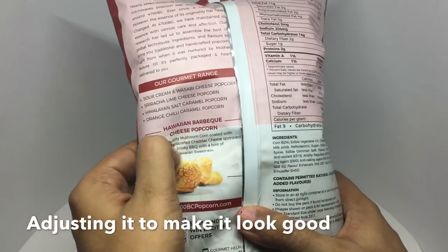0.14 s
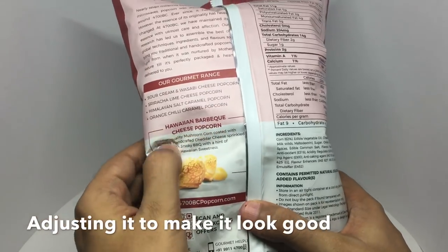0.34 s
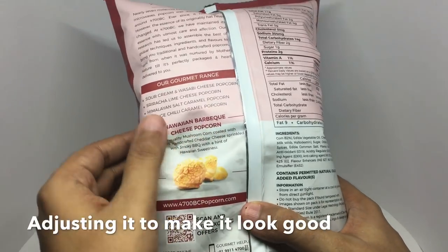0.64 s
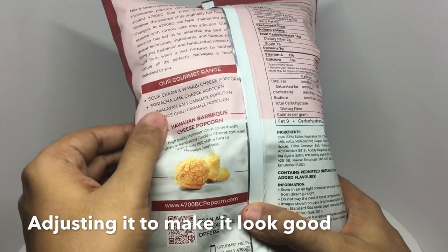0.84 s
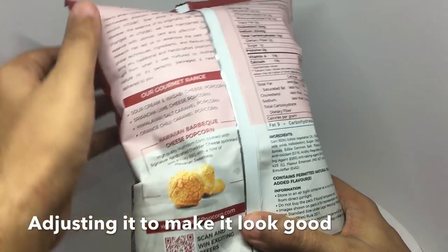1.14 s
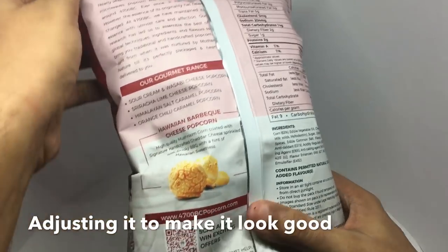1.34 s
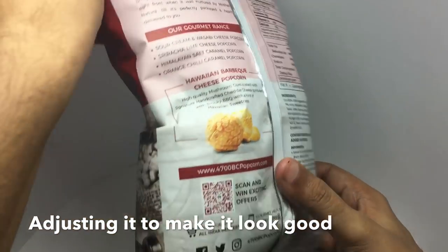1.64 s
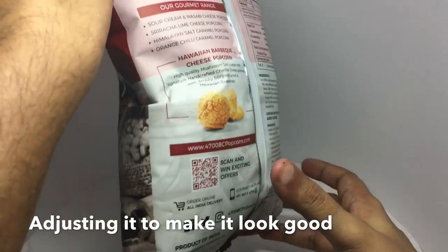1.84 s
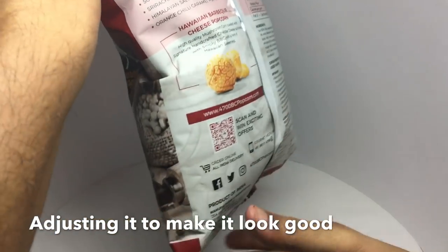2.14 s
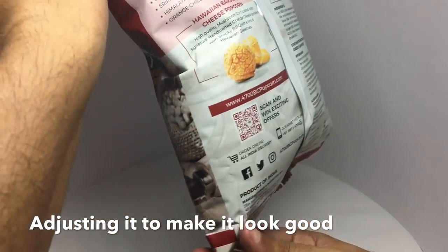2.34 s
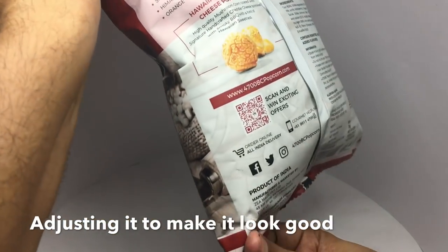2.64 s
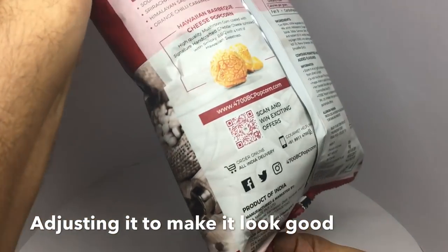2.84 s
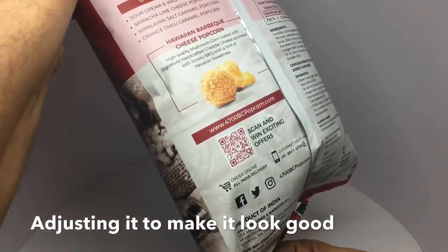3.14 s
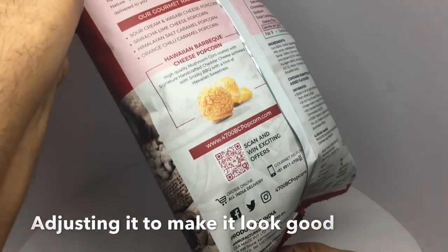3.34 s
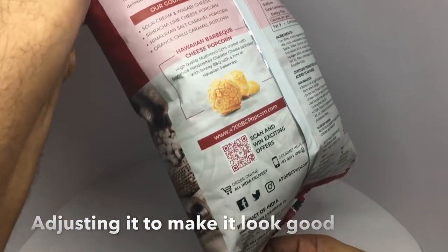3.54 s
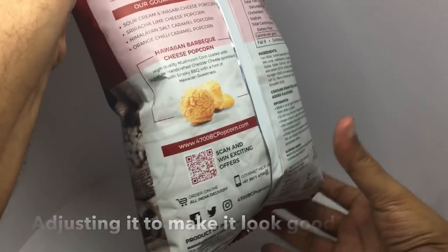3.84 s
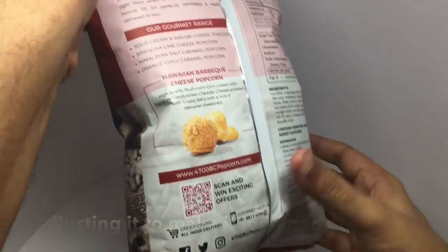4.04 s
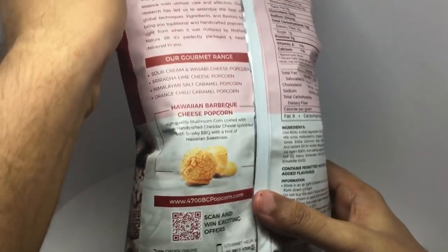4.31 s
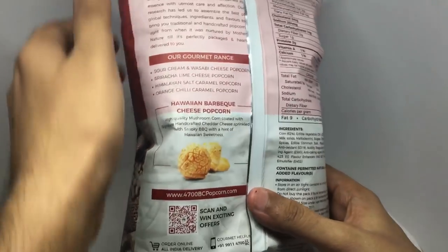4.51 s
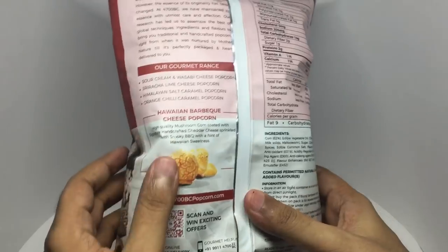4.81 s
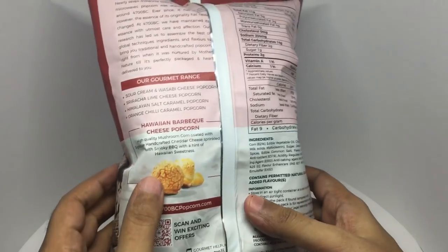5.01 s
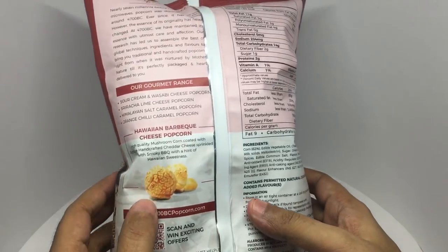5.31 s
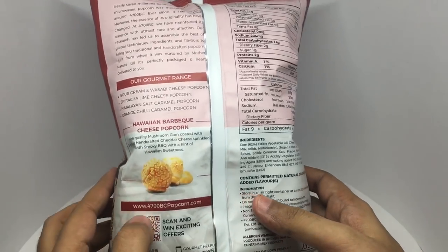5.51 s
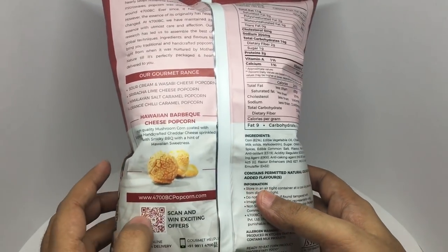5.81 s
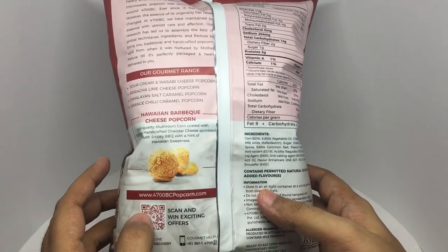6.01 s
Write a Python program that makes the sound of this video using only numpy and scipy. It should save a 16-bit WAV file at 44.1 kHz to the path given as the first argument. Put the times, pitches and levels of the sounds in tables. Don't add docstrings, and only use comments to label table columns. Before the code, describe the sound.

Two hands turn and straighten a sealed, air-filled plastic bag very close to a stereo microphone in a quiet room with a faint low hum. Crisp creases crack at once, a loud snap follows before one second, then sparse crackles and finger hiss. Snaps crowd together near three seconds, and the hardest pop comes around four and a half before the crackling fades out.

```python
import sys
import numpy as np
from scipy import signal
from scipy.fft import rfft, irfft, next_fast_len
from scipy.io import wavfile
from scipy.ndimage import uniform_filter1d

SR = 44100
rng = np.random.default_rng(int(sys.argv[2]) if len(sys.argv) > 2 else 0)


def wav_out(sig):
    wavfile.write(sys.argv[1], SR, np.round(np.clip(np.atleast_2d(sig).T, -1, 1) * 32767).astype(np.int16))


def boost_factor(decibels):
    exponent = np.asarray(decibels, float) / 20
    return 10 ** exponent


N = 271656


def evened(x):
    return x / np.sqrt(np.mean(x ** 2) + 1e-20)


def peaked(x, level_db):
    return boost_factor(level_db) * x / np.sqrt(uniform_filter1d(x[0] ** 2, size=176).max() + 1e-20)


def add(mix, start_s, sound):
    part = mix[:, round(start_s * SR):][:, :sound.shape[1]]
    part += sound[:, :part.shape[1]]


def read(points, hz):
    point_hz, value = np.transpose(points)
    return np.interp(np.log(hz + 1), np.log(point_hz + 1), value)


def colour(spectrum):
    hz = abs(np.fft.fftfreq(4096, 1 / SR))
    log_gain = np.log(boost_factor(np.maximum(read(spectrum, hz), -80)))
    taps = np.fft.ifft(np.exp(np.conj(signal.hilbert(log_gain)))).real[:2048]
    return taps[None] / np.linalg.norm(taps)


def coloured(x, taps):
    return signal.fftconvolve(x, taps, axes=1)[:, :x.shape[1]]


def resonate(x, hz, width_hz):
    r = np.exp(-np.pi * width_hz / SR)
    section = [1, 0, -1, 1, -2 * r * np.cos(2 * np.pi * hz / SR), r * r]
    return signal.sosfilt([section, section], x) * (1 - r) ** 2


def softened(x, hz):
    return signal.sosfilt(signal.butter(2, min(hz, 9000), fs=SR, output="sos"), x)


def grit(shape, spread_db):
    return rng.standard_normal(shape) * boost_factor(spread_db * rng.standard_normal(shape))


# pitch_hz, density_db (dB per Hz)
AIR = [(12, -38.5), (20, -4), (44, -4), (70, 0.5), (118, -3.5), (239, -11.5), (370, -12.5), (572, -22.5),
       (884, -28.5), (1230, -23.5), (3450, -30), (9730, -35.5), (13500, -38)]


def background():
    hum_hz, throb_hz = 59.8, 30.4
    air = boost_factor(-65) * evened(coloured(rng.standard_normal((2, N)), colour([*AIR, (14600, -75.0)])))
    wander = evened(uniform_filter1d(uniform_filter1d(rng.standard_normal(N), size=3000), size=3000))
    turns_s = np.cumsum(1 + .035 * wander) / SR
    throb = 1 + 0.24 * np.sin(2 * np.pi * throb_hz * turns_s)
    hum = np.sin(2 * np.pi * hum_hz * turns_s) * throb
    return air + boost_factor(-63.5) * evened(hum) * [[1], [0]]


# pitch_hz, t60_s
ROOM = [(150, 0.69), (500, 0.42), (2000, 0.53), (6000, 0.33), (14000, 0.15)]


def room(x):
    t = np.arange(SR // 2) / SR
    sway = np.arange(N) / SR * 2 * np.pi * 9.
    out = 0
    for k in range(3):
        hz, at, z = signal.stft(rng.standard_normal((2, len(t))), SR, nperseg=256)
        late = boost_factor(-60 * at / read(ROOM, hz)[:, None])
        near_walls = 3.94 * boost_factor(-60 * at / 0.03)
        tail = signal.istft(z * (late + near_walls), SR, nperseg=256)[1][:, :len(t)]
        tail = tail * np.clip((t - .004) / 0.0043, 0, 1)
        share = np.cos(sway + 2 * np.pi * k / 3) * np.sqrt(2 / 3)
        out = out + signal.fftconvolve(x * share, tail / np.linalg.norm(tail[0]), axes=1)[:, :N]
    return out


# pitch_hz, width_hz, level_db
BOOM = [(114.9, 7.8, 25), (177.2, 17.5, 14.5), (199, 15, 9.5)]


def boom(x):
    return sum(boost_factor(level_db) * resonate(x, hz, width_hz) for hz, width_hz, level_db in BOOM)


def strokes(rows):
    touch_s, lift_db_per_s = 0.015, 139.5
    t = np.arange(0, N + 64, 64) / SR
    each = []
    for start_s, length_s, level_db in rows:
        lifted_s = np.maximum(t - start_s - length_s, 0)
        each.append(np.clip((t - start_s) / touch_s, 0, 1) * boost_factor(level_db - lift_db_per_s * lifted_s))
    return np.interp(np.arange(N) / SR, t, np.linalg.norm(each, axis=0))


# pitch_hz, density_db (dB per Hz)
SLIDE = [(880, -29), (1500, -31), (2190, 2), (2410, 2), (3180, 1), (5880, -3.5), (10800, -3.5),
         (16000, -16)]
# start_s, length_s, level_db
STROKES = [(-0.02, .23, -63), (0.328, 0.19, -66), (0.615, 0.17, -70.5), (0.769, 0.26, -64),
           (1.247, 0.27, -70.5), (1.616, .13, -69.5), (1.76, 0.022, -62), (1.854, 0.11, -75.5),
           (2.1, 0.56, -90.5), (2.578, 0.056, -67), (2.704, 0.05, -67.5), (2.836, 0.1, -70.5),
           (3.02, 0.059, -68), (3.15, 0.062, -78), (3.5, .03, -73), (3.6, 0.13, -73.5), (3.8, 0.05, -65.5),
           (4.18, 0.5, -73.5), (4.377, 0.22, -67.5), (4.712, 0.071, -71), (4.88, 0.1, -68.5),
           (5.07, 0.053, -73), (5.293, 0.27, -75), (5.87, 0.084, -88)]
# start_s, length_s, level_db
DRY_STROKES = [
    (-0.02, 0.16, -84),
    (.33, 0.13, -73),
    (.8, .25, -72),
    (1.25, 0.17, -65),
    (3.6, .03, -68),
    (3.83, 0.051, -81),
    (4.4, 0.21, -77),
    (5.3, 0.21, -86),
]


def sliding():
    slips = grit((2, N), 2.5)
    out = boost_factor(3.0) * strokes(STROKES) * evened(coloured(slips, colour(SLIDE)))
    fizz = resonate(slips[:, ::-1], 10800, 6500)
    out += strokes(DRY_STROKES) * evened(fizz)
    start_s, end_s, squeak_hz = 3.92, 4, 7367
    squeak = evened(resonate(rng.standard_normal((2, round((end_s - start_s) * SR))), squeak_hz, 150.))
    add(out, start_s, boost_factor(-83) * squeak * signal.windows.tukey(squeak.shape[1], .4))
    return out


# pitch_hz, density_db (dB per Hz)
CRUMPLE = [(53, -43.5), (90, -7), (173, 10.5), (553, 2.5), (814, -9), (900, -37.5), (979, -10.5),
           (1440, -13.5), (5000, -38), (6500, -33.5), (11000, -120)]
# start_s, level_db
CRUMPLING = [(0.0, -58), (0.43, -61), (1.2, -71.5), (1.68, -56), (1.82, -59), (1.97, -77.5), (2.5, -72),
             (2.78, -58.5), (2.88, -41), (3.14, -58), (3.28, -76), (3.68, -52.5), (3.98, -83.5),
             (4.27, -64.5), (4.45, -52), (4.65, -68.5), (5.08, -64), (6.16, -74.5)]


def crumpling():
    effort = boost_factor(np.interp(np.arange(N) / SR, *np.transpose(CRUMPLING)))
    folds = boost_factor(4.07 * np.minimum(rng.exponential(1, (2, N)), 4)) * (rng.random(N) < 300. / SR)
    soft = resonate(coloured(folds, colour(CRUMPLE)), 420.0, 2500.)
    return boost_factor(-1.5) * effort * evened(soft)


# pitch_hz, width_hz, level_db
SHELL = [(546., 35, -1), (662.6, 80, -3), (775, 150, -6), (989, 60., -3), (1200., 170, -3.5),
         (1531, 36.4, -0.5), (1876, 33, 4.5), (2252, 49, 2.5), (2476., 82, -11.5), (2925, 38, 0.5),
         (3400., 100, -6), (9650, 900., -4), (10560, 520, -5.5)]


def shell(x):
    return sum(boost_factor(level_db) * resonate(x, hz, width_hz) for hz, width_hz, level_db in SHELL)


def burst(rise_s, fall_s, spread_db, lead):
    t = np.arange(1500) / SR
    run = grit((2, len(t)), spread_db) * (1 - np.exp(-t / rise_s)) * np.exp(-t / fall_s)
    run[:, round(rise_s * SR)] += lead * np.linalg.norm(run, axis=1) * rng.choice([-1, 1], 2)
    return run


def crease(film, leads, crack_db, ring_db, thump_db, pitch_hz):
    run_s = 0.0034 * boost_factor(0.19 * (max(crack_db, ring_db, thump_db) + 44))
    span = boost_factor(.25 * (max(ring_db, thump_db) + 33))
    if pitch_hz >= 900:
        pillow_hz, panel_hz, slack, taut_db = 513, pitch_hz, .72, -.6
    else:
        pillow_hz, panel_hz, slack, taut_db = pitch_hz, 1334, .95, -3.2
    crack = coloured(burst(0.00017, run_s, 2.6, leads[0]), film)

    drive = softened(burst(0.0012, 0.0045 * span, 2.0, leads[1]), 2.37 * panel_hz)
    ring = resonate(drive, panel_hz, slack * panel_hz)
    ring += 0.27 * resonate(drive, 1.68 * panel_hz, 1300.0)
    ring += 0.46 * resonate(drive, 0.65 * panel_hz, 550.0)

    push = softened(burst(0.001553, .003 * span, 1.1, leads[2]), 870.0)
    thump = resonate(push, pillow_hz, .45 * pillow_hz)
    thump += 0.6 * resonate(push, 351.0, 260.)
    thump += 0.37 * resonate(push, 865.0, 600.)
    return peaked(crack, crack_db - 3.5) + peaked(ring, ring_db + taut_db) + peaked(thump, thump_db + 1.42)


# start_s, crack_db, ring_db, thump_db, pitch_hz
CRACKS = [(0.034, -31, -28.5, -36.5, 704), (0.152, -31.5, -33, -40, 710), (0.781, -29.5, -34, -38, 1200),
          (0.863, -19, -23.5, -33.5, 635), (0.876, -45.5, -36, -34, 475), (0.901, -35, -41.5, -47, 486),
          (1.683, -47, -32.5, -39.5, 335), (1.745, -36.5, -39.5, -44.5, 696), (1.752, -43.5, -34, -47, 320),
          (1.787, -44.5, -34, -47, 1100), (1.9, -30.5, -39, -48.5, 1310), (2.641, -32.5, -38, -46.5, 1530),
          (2.72, -27, -25.5, -38, 640), (2.776, -41.5, -37.5, -64, 326), (2.825, -55, -49, -42.5, 330),
          (2.841, -32.5, -31.5, -38, 580), (2.859, -37.5, -41, -46, 335), (3.022, -34.5, -35, -40.5, 620),
          (3.064, -42, -41, -43, 1140), (3.505, -29.5, -34.5, -44.5, 1680),
          (3.659, -29.5, -28.5, -40.5, 546), (3.763, -39, -36, -46, 735), (3.862, -48, -43.5, -56, 1060),
          (4.483, -19, -22, -25, 477)]
# start_s, ring_db, thump_db, pitch_hz
FLIPS = [(0.172, -37.5, -40, 324), (0.208, -42, -40.5, 786), (0.502, -39.5, -44.5, 595),
         (0.52, -47, -37, 390), (0.762, -33, -35, 636), (1.332, -39.5, -46.5, 1600),
         (1.453, -36.5, -43.5, 1220), (1.541, -51.5, -53, 460), (1.607, -42.5, -55, 1190),
         (2.172, -38.5, -44, 1850), (2.395, -53, -61, 1160), (2.603, -45.5, -51.5, 340),
         (2.623, -40.5, -45.5, 500), (2.674, -38, -42.5, 333), (2.707, -46, -48, 366),
         (2.873, -38, -37.5, 312), (2.911, -54, -37.5, 313), (2.944, -37, -32, 530),
         (3.07, -37.5, -39.5, 287), (3.08, -49, -43, 676), (3.722, -38.5, -43, 700),
         (3.747, -47.5, -53, 684), (4.293, -49, -48, 566), (4.381, -36.5, -45, 530), (4.435, -44, -43, 540),
         (4.885, -50, -51.5, 1240), (4.971, -51.5, -51, 3400), (5.148, -53, -56.5, 950),
         (5.863, -41, -50.5, 1065), (5.901, -43.5, -41, 302)]
# start_s, thump_db, pitch_hz
DENTS = [(0.309, -47, 285), (0.39, -44, 750), (0.432, -50.5, 596), (0.574, -55, 303), (0.598, -49, 696),
         (0.792, -37.5, 410), (1.373, -52, 530), (1.714, -39, 504), (2.444, -58.5, 466), (2.89, -35, 580),
         (3.04, -40.5, 327), (3.216, -52, 342), (3.297, -58, 728), (3.317, -54, 289), (3.376, -58, 415),
         (3.468, -50, 574), (3.603, -48.5, 610), (3.629, -50.5, 336), (4.232, -50.5, 370), (4.32, -57, 293),
         (4.395, -35, 715), (4.422, -33, 470), (4.933, -56.5, 280), (4.983, -44.5, 644), (5.046, -49, 600),
         (5.08, -50.5, 382), (5.136, -51, 577), (5.44, -59.5, 692), (5.534, -45, 374), (5.818, -57.5, 850)]
# start_s, crack_db, thump_db
TICKS = [(0.342, -56, -48), (0.949, -53.5, -46), (1.023, -51, -48.5), (1.253, -54.5, -56.5),
         (1.318, -65, -61), (1.443, -46.5, -62), (1.876, -53, -58.5), (1.964, -51, -53),
         (2.027, -54.5, -79), (2.055, -58.5, -80), (2.551, -57.5, -80), (3.245, -57, -69),
         (3.814, -55, -50), (3.875, -45, -54), (4.175, -69.5, -61.5), (4.846, -62, -47), (4.858, -48, -77),
         (5.303, -61.5, -50.5), (5.338, -60, -61), (5.489, -68, -68)]


def every_crease():
    rows = list(CRACKS)
    rows += [(s, ring - 23.5, ring, thump, hz) for s, ring, thump, hz in FLIPS]
    rows += [(s, thump - 16, thump - 10.5, thump, hz) for s, thump, hz in DENTS]
    rows += [(s, crack, crack - 6, thump, 335) for s, crack, thump in TICKS]
    return rows


# pitch_hz, density_db (dB per Hz)
CRACK = [(1470, -26.5), (2500, -3.5), (3430, -1), (3770, -2.5), (4380, -2), (5330, -3.5), (11200, -4),
         (15000, -14), (16500, -34)]


def snaps():
    direct, sent = np.zeros((2, 2, N))
    facing = colour(CRACK)[:, :256]
    shaded = softened(facing, 8800.)
    for start_s, *row in every_crease():
        film = shaded if 2.95 < start_s < 3.8 else facing
        add(direct, start_s + .0008, crease(film, (.6, .8, 1.3), *row))
        add(sent, start_s, crease(film, (8, 8, 8), *row))
    return direct, sent


def scene():
    direct, sent = snaps()
    folds = crumpling()
    bag = direct + boost_factor(-1.0) * shell(direct + folds) + folds + sliding()
    return bag + boost_factor(-7.) * room(sent + folds) + boom(sent + folds) + background()


def gated(x):
    gate_hz, gate_db, gate_db_per_khz = 13200, -117, 6.5
    hz, _, z = signal.stft(x, SR, nperseg=1024)
    hz = hz[:, None]
    power = uniform_filter1d((abs(z) ** 2).mean(0), size=12, axis=0)
    over_db = 10 * np.log10(abs(power) + 1e-20) - gate_db - gate_db_per_khz * (hz - gate_hz) / 1000
    keep = np.where(hz > gate_hz, np.clip(over_db / 2, 0, 1), 1)
    return signal.istft(z * keep, SR, nperseg=1024)[1][:, :N]


def top_cut(x):
    return signal.sosfilt(signal.butter(12, 16840, fs=SR, output="sos"), x)


# pitch_hz, likeness (0 to 1)
SAME = [(60, 0.85), (130, 0.84), (290, 0.93), (640, 0.72), (1410, 0.52), (3100, 0.32), (6820, 0.57),
        (15000, 1)]
# pitch_hz, level_db
LEAN = [(60, -1), (110, 3.5), (200, -1.5), (380, -0.5), (700, -11), (1290, -3), (2380, -2.5), (4400, -1),
        (8120, -0.5), (15000, -2.5)]


def record(dry):
    size = next_fast_len(N)
    hz = np.fft.rfftfreq(size, 1 / SR)
    common, other = rfft(dry, size) * (hz < 16750)
    half = np.arccos(np.clip(read(SAME, hz), 0, 1)) / 2
    lean = boost_factor(read(LEAN, hz) / 2)
    left = (np.cos(half) * common + np.sin(half) * other) * lean
    right = (np.cos(half) * common - np.sin(half) * other) / lean
    mix = gated(irfft(np.array([left, right]), size)[:, :N])
    return top_cut(mix)


dry = scene()
out = record(dry)
wav_out(out)
```